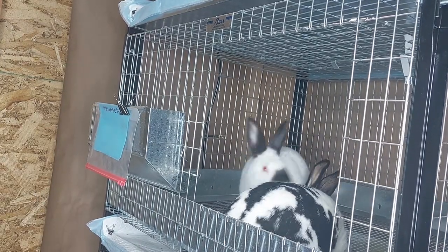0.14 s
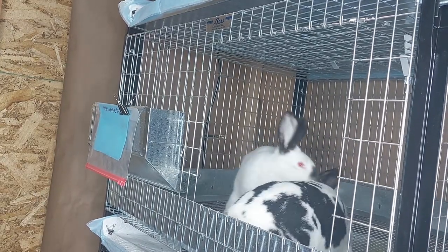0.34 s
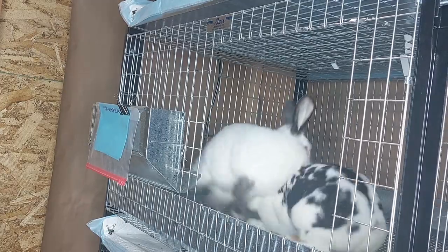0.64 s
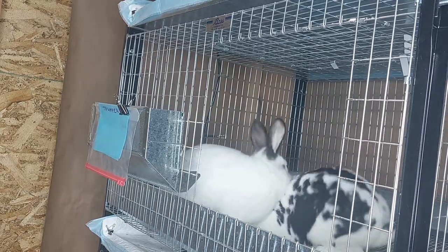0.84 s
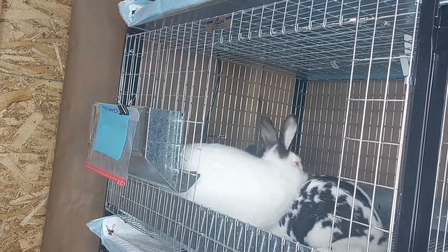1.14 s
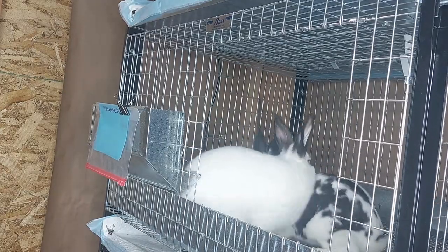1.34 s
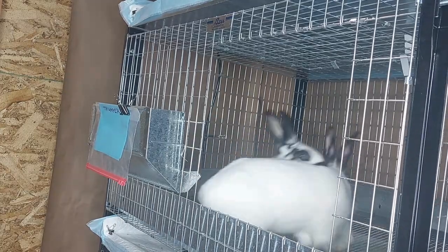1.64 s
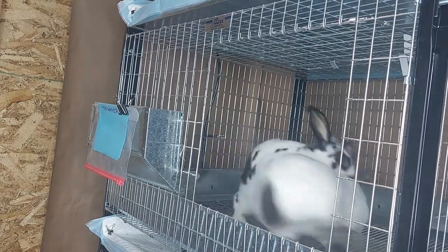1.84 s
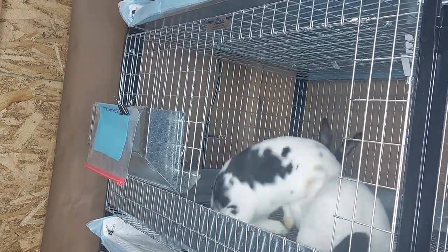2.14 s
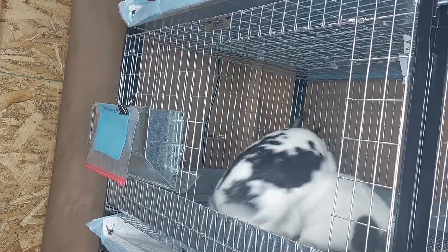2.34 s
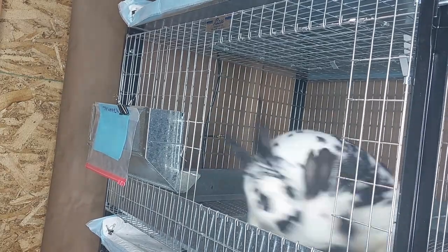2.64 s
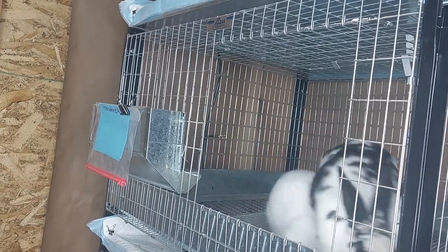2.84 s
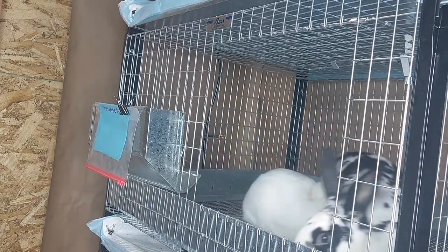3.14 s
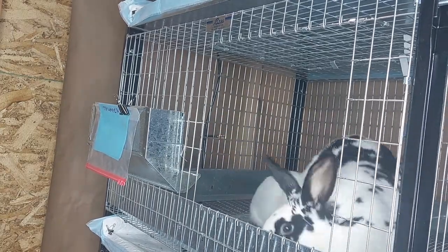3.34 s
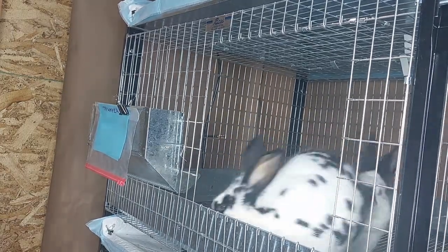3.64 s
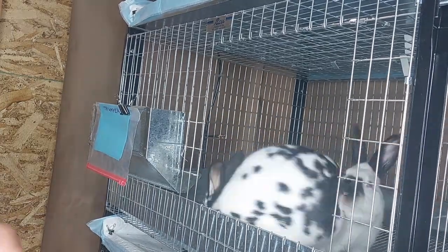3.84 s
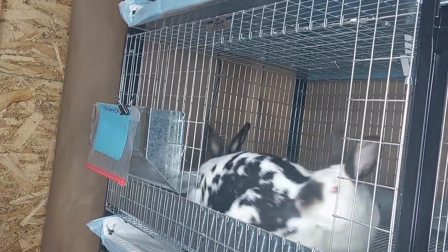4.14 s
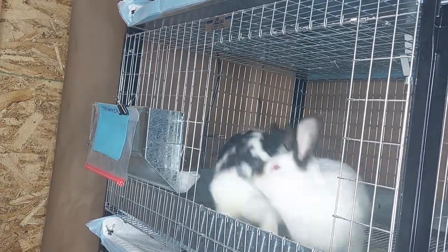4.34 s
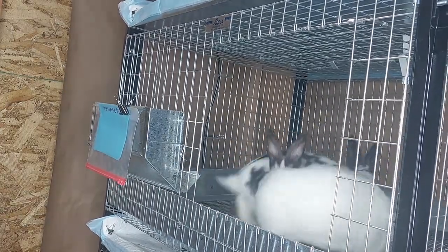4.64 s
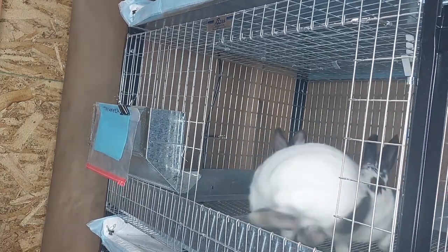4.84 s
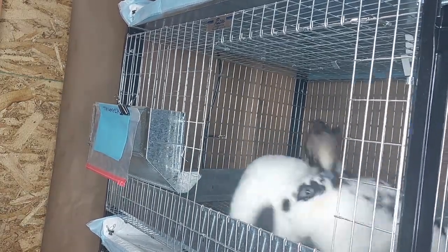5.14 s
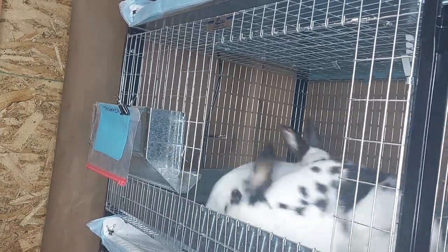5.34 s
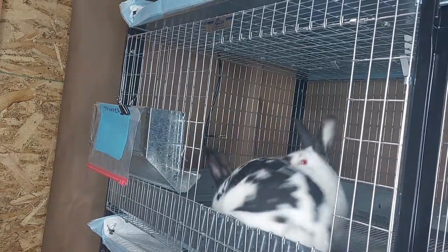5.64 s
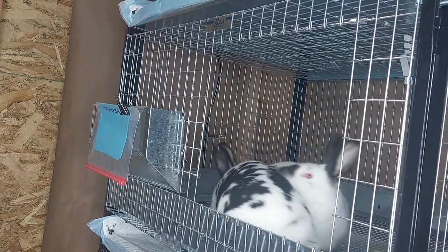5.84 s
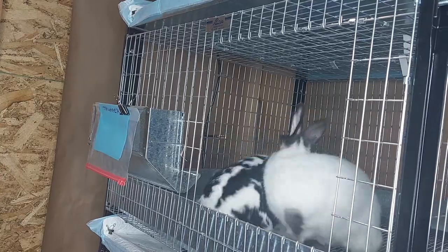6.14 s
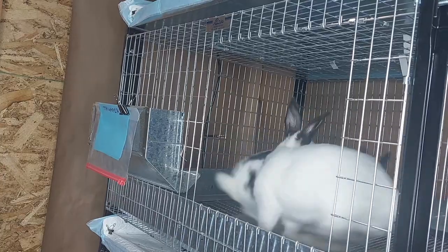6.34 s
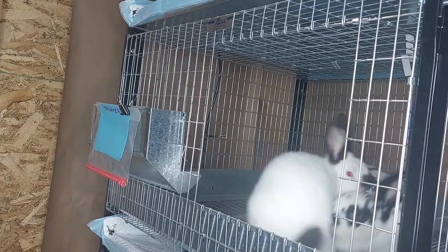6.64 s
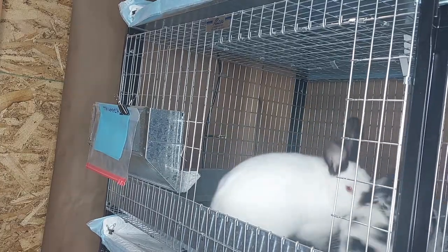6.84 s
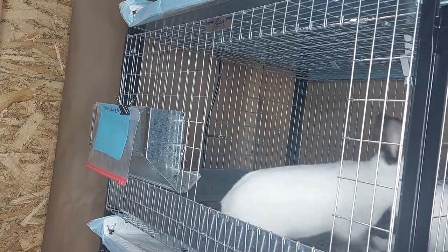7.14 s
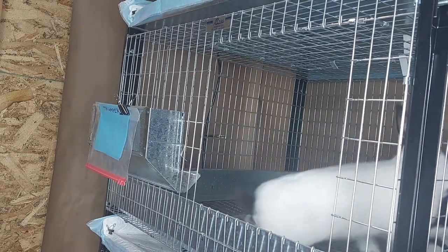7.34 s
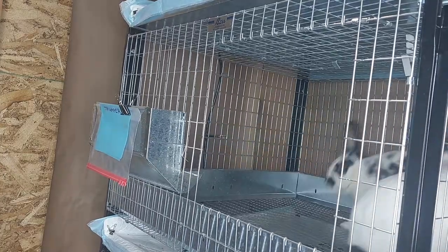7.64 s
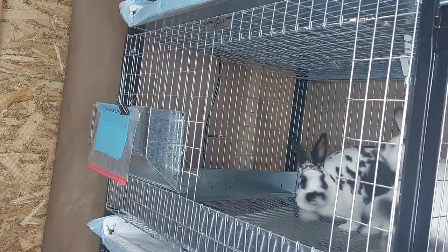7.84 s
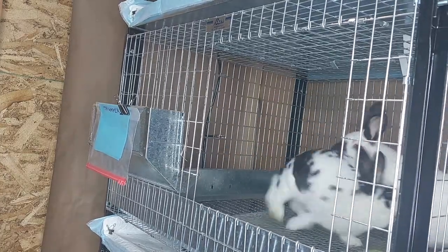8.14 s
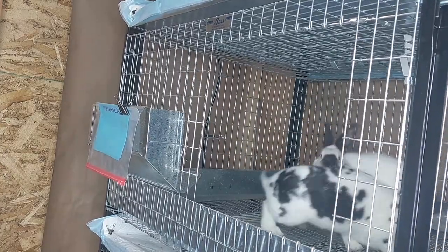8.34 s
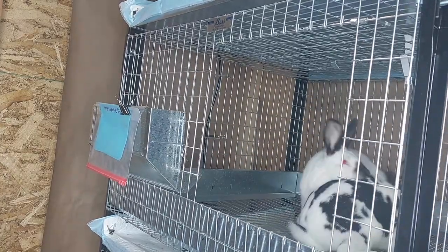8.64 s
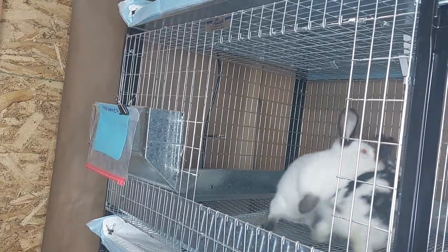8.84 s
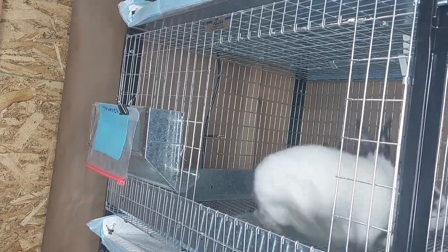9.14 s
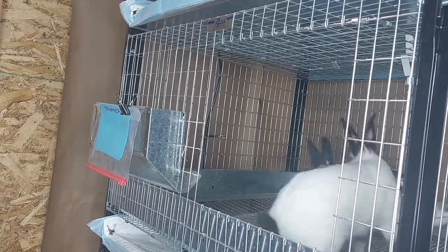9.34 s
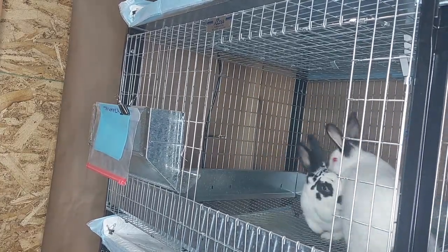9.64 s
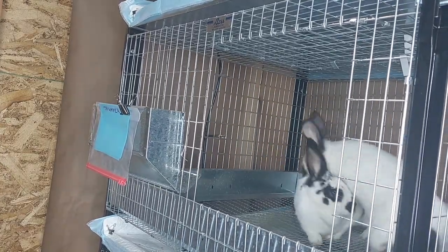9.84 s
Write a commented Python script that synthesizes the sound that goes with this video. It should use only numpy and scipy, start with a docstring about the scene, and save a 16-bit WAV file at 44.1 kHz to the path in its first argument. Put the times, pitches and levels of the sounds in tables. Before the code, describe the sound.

Bursts of scratchy, metallic cage rattle as two rabbits chase and shove on a mesh floor, with dull thumps, in a small wooden shed.

```python
"""A hissing, clattering scuffle: two rabbits in a wire cage in a small wooden shed, about a metre from a phone.
Each shove of a paw gathers, swells, lets go and settles, dragging claws and fur over the mesh: dense trains
of slips make the wires hiss, the bars and frame clatter and the sheet-metal tray rumble.
Hind feet thump the floor, struck as a set of decaying modes.
Behind them a motor hums faintly and unsteadily as a few sines, over filtered noise for the air."""
import sys
import numpy as np
from scipy import signal
from scipy.fft import rfft, irfft, next_fast_len
from scipy.io import wavfile
from scipy.ndimage import uniform_filter1d, map_coordinates

SR = 44100
rng = np.random.default_rng(int(sys.argv[2]) if len(sys.argv) > 2 else 0)


def to_wav(sig):
    """Store sig (one row per channel, or 1-D mono) as 16-bit WAV at the path in sys.argv[1].

    Samples outside -1..1 are clipped; the rate is SR.
    """
    pcm = np.clip(np.atleast_2d(sig), -1, 1) * 32767
    pcm = np.round(pcm).astype(np.int16)
    wavfile.write(sys.argv[1], SR, pcm.T)  # frames by channels


N = 440559

# Shoves of a paw over the mesh. Each row: peak in seconds, time to let go in seconds,
# drive of the wires in dB, extra body weight on the heavy parts in dB.
PAW_SHOVES = [(0.34, 0.57, -53, 1), (0.666, 0.16, -27, 2.5), (0.761, 0.32, -35.5, -2.5),
              (0.887, 0.18, -39, 3), (1.337, 0.044, -58.5, -11), (1.453, 0.16, -28.5, -8),
              (1.591, 0.1, -28.5, 2.5), (1.83, 0.31, -31, 3), (1.883, 0.16, -28, -1),
              (1.947, 0.23, -28.5, 2.5), (2.083, 0.13, -34.5, -1), (2.44, 0.044, -44, -1),
              (2.529, 0.19, -27.0, 1.5), (2.564, 0.19, -23.0, -1.5), (2.751, 0.15, -33.0, 1.0),
              (2.875, 0.35, -36.5, 1), (2.972, 0.14, -28, 0.5), (3.35, 0.13, -48, -1.5),
              (3.424, 0.19, -38.5, -2), (3.608, 0.096, -35, -4.5), (3.688, 0.13, -37.5, -0.5),
              (4.15, 0.15, -44, -3.5), (4.244, 0.13, -43.0, -1), (4.459, 0.56, -39, 5.5),
              (4.497, 0.096, -21.5, -1), (4.631, 0.078, -31.5, 3), (4.738, 0.42, -27.5, 0),
              (4.871, 0.085, -21, 3), (5.033, 0.35, -35.5, 0.0), (5.221, 0.61, -35.5, 3.0),
              (5.348, 0.082, -28.5, 2), (5.42, 0.088, -23, 1.5), (5.565, 0.33, -33.5, 1.5),
              (5.674, 0.093, -19.5, 0.5), (5.764, 0.22, -32.5, 0), (5.94, 0.63, -38.5, -1.5),
              (6.092, 0.13, -31, -7.0), (6.149, 0.08, -31, 3), (6.323, 0.29, -34, -5.0),
              (6.412, 0.23, -31.5, 1), (6.471, 0.1, -21, 0), (6.687, 0.47, -40.5, 1),
              (6.887, 0.1, -35, -1.5), (7.136, 0.34, -50.0, -1), (7.291, 0.033, -48.5, -2.0),
              (7.49, 0.17, -28, -4.5), (7.554, 0.079, -28, 3.5), (7.644, 0.25, -46.5, 1.5),
              (7.745, 0.044, -42.5, -6.5), (7.96, 0.37, -36.0, -0.5), (8.096, 0.48, -41.5, 1.5),
              (8.196, 0.05, -35.5, 7.5), (8.272, 0.1, -33.5, 3.5), (8.369, 0.11, -26, 4.5),
              (8.42, 0.15, -28, -5), (8.486, 0.22, -31.5, 2.5), (8.63, 0.28, -42, -3),
              (8.824, 0.21, -39.5, 3), (8.877, 0.08, -32, 1.5), (8.934, 0.14, -29.5, -3.5),
              (9.061, 0.17, -29, 1), (9.208, 0.11, -22, 1), (9.502, 0.096, -35.5, 0.5),
              (9.606, 0.077, -26, 2), (9.688, 0.094, -23.5, 0.5), (9.791, 0.12, -40.5, -0.5)]
PLACES = 4  # spots on the mesh that the paws take in turn


def scuffling():
    """The rabbits keep moving, so successive shoves fall on different places of the mesh."""
    fine = patchy_hiss(slips(rate=4500, spread_db=3.0), patchy_db=5.0, width_hz=687, hold_s=.018)
    coarse = patchy_hiss(slips(rate=2400, spread_db=2.5), patchy_db=6, width_hz=223, hold_s=.04)
    cage = np.zeros((2, N))
    for place in range(PLACES):
        # every place has its own stretch of the slipping
        shift = place * SR
        cage += scrabbling(PAW_SHOVES[place::PLACES], np.roll(fine, shift), np.roll(coarse, shift))
    return cage


# Spectra of the thin wires, stout bars, frame and sheet-metal tray, before they vary from place to place.
# Each row: frequency in Hz, relative level in dB.
WIRE_SPECTRUM = [(2590, -30.5), (4400, -4), (5830, -5.5), (8190, -5), (9840, -8.5), (12100, -2),
                 (15100, -4.5), (16000, -7.5)]
BAR_SPECTRUM = [(1410, -29.5), (2400, -3.5), (3300, 0), (3590, -0.5), (4030, -0.5), (4500, -8),
                (5850, -28.5), (9900, -120)]
FRAME_SPECTRUM = [(250, -31.5), (430, -6.5), (495, -6.5), (626, -1), (674, -4.5), (731, -2.5), (781, -7),
                  (911, -2.5), (981, -5.5), (1240, -7), (1770, -0.5), (2370, -9), (2500, -25.5),
                  (3250, -11), (5500, -120)]
TRAY_SPECTRUM = [(53, -46), (90, -16.5), (113, -4), (151, -10), (232, -1), (265, -0.5), (298, -4),
                 (328, -8), (366, -2.5), (470, -15), (610, -14), (1030, -120)]


def scrabbling(shoves, fine, coarse):
    """Shoves at one place on the mesh drive the thin wires, the stout bars, the frame and the heavy tray."""
    wire_db, frame_db, tray_db = loads(shoves)
    grip = catching(rate=150, depth_db=3.0) * catching(rate=20, depth_db=1.3)

    wire_force = grip * sharpen(fine, pressure(shoves, wire_db), edge_hz=11700, firm_db=-42.0, power=0.14)
    # the bars join the wires to the frame and take their level from both
    bar_force = grip * fine * pressure(shoves, (wire_db + frame_db) / 2)
    frame_scrape = sharpen(coarse, pressure(shoves, frame_db), edge_hz=1630, firm_db=-33, power=0.28)
    frame_force = np.sqrt(grip) * frame_scrape
    tray_force = slips(rate=900, spread_db=4.5) * pressure(shoves, tray_db)

    wires = play(wire_force, part(WIRE_SPECTRUM, vary_db=.5, ring_t60=0.017, shed_t60=0.4, shed_db=-12.5))
    bars = play(bar_force, part(BAR_SPECTRUM, vary_db=.5, ring_t60=0.034, shed_t60=0.46, shed_db=-4.0))
    frame = play(frame_force, part(FRAME_SPECTRUM, vary_db=0.26, ring_t60=0.054, shed_t60=0.57, shed_db=-0.5))
    tray = play(tray_force, part(TRAY_SPECTRUM, vary_db=2.0, ring_t60=0.049, shed_t60=0.68, shed_db=0.0))
    return undb(0.86) * wires + undb(-4.5) * bars + frame + tray


# drive of wires, frame and tray in an ordinary shove
WIRE_DB, FRAME_DB, TRAY_DB = -25, -30.5, -37.5
# dB that frame and tray gain for each dB of the wires
FRAME_GROWTH, TRAY_GROWTH = 0.78, 0.6


def loads(shoves):
    """Drive in dB: the heavy parts follow the wires less steeply, and feel the body's weight."""
    _, _, wire_db, weight_db = np.transpose(shoves)
    effort_db = wire_db - WIRE_DB
    frame_db = FRAME_DB + FRAME_GROWTH * effort_db + weight_db
    tray_db = TRAY_DB + TRAY_GROWTH * effort_db + weight_db
    return wire_db, frame_db, tray_db


# a shove of ordinary length swells in ATTACK_S; short kicks swell faster, long drags more slowly
# (by this power of the length)
LENGTH_S, ATTACK_S, ATTACK_POWER = 0.15, 0.035, 0.17
# the paw gathers a grip first: level where the swell begins, before the weight is added, and growth until then
GATHER_DB, GATHER_DB_PER_S = -17, 230
# after each shove the paws shuffle on faintly
SETTLE_DB, SETTLE_T60_S = -18, 1.33


def pressure(shoves, levels_db):
    """How hard the paws drag: each shove gathers, swells, lets go and settles; their powers add."""
    t = np.arange(-SR // 4, SR) / SR  # seconds from the peak
    power = np.zeros(N)
    settling = undb(SETTLE_DB - 60 * np.maximum(t, 0) / SETTLE_T60_S)
    for (peak_s, length, _, weight_db), db in zip(shoves, levels_db):
        attack = ATTACK_S * (length / LENGTH_S) ** ATTACK_POWER
        swell = np.interp(t, [-attack, 0], [0, 1])
        # the more weight the paw bears, the stronger the gathering
        gather_db = GATHER_DB + weight_db + GATHER_DB_PER_S * np.minimum(t + attack, 0)
        gathering = (1 - swell) * undb(gather_db) ** 2
        letting_go = np.interp(t, [0, length], [1, 0])
        shove = swell ** 2 * (letting_go ** 2 + settling ** 2)
        add(power, peak_s + t[0], undb(db) ** 2 * (gathering + shove))
    return np.sqrt(power)


def slips(rate, spread_db):
    """Tiny stick-slip kicks of uneven size, at a mean rate per second; rms 1."""
    happens = rng.random(N) < rate / SR
    size = undb(spread_db * rng.standard_normal(N))
    kicks = happens * rng.choice([-1, 1], N) * size
    return kicks / np.std(kicks)


def patchy_hiss(kicks, patchy_db, width_hz, hold_s):
    """The hiss is patchy: random pitches are favoured for a moment; rms 1."""
    hz, s, frames = signal.stft(kicks, SR, nperseg=512)
    spots = np.meshgrid(hz / width_hz, s / hold_s, indexing="ij")
    favour = map_coordinates(rng.standard_normal((200, 2000)), spots, order=1, mode="wrap")
    patchy_frames = frames * undb(patchy_db * np.tanh(favour))
    kicks = signal.istft(patchy_frames, SR)[1][:N]
    return kicks / np.std(kicks)


def catching(rate, depth_db):
    """The claws catch and free themselves: a gain gliding to a new random value rate times a second; rms 1."""
    steps = np.tanh(rng.standard_normal(N))
    gain = undb(depth_db * np.interp(np.arange(N) * rate / SR, np.arange(N), steps))
    return gain / np.sqrt(np.mean(gain ** 2))


def sharpen(kicks, force, edge_hz, firm_db, power):
    """Firm scrapes slip more abruptly, so the sound above edge_hz grows faster than the rest."""
    low_pass = signal.butter(2, edge_hz, fs=SR, output="sos")
    soft = signal.sosfiltfilt(low_pass, kicks)
    sharp = (kicks - soft) * (force / undb(firm_db)) ** power
    return force * (soft + sharp)


def part(spectrum, vary_db, ring_t60, shed_t60, shed_db):
    """Response of one part of the cage; its colour differs a little from place to place."""
    here = [(hz, db + vary_db * rng.standard_normal()) for hz, db in spectrum]
    return unit(colour(ringing(ring_t60, shed_t60, shed_db), here))


def ringing(ring_t60, shed_t60, shed_db):
    """Countless close modes die quickly; the shed's boards carry the sound on. Cut at half a second."""
    t = np.arange(SR) / SR
    ring_power = unit(undb(-60 * t / ring_t60)) ** 2
    shed_power = unit(undb(-60 * t / shed_t60)) ** 2 * undb(2 * shed_db)
    spectrum = rfft(rng.standard_normal((2, len(t))) * np.sqrt(ring_power + shed_power))
    # the modes share the energy evenly over every stretch of frequencies
    spectrum /= np.sqrt(uniform_filter1d(np.abs(spectrum) ** 2, size=80))
    return ears(irfft(spectrum))[:, :SR // 2]


# Footfalls of the hind feet. Each row: start in seconds, strength in dB,
# pitch that the landing place favours in Hz, spread around it in octaves.
FOOTFALLS = [(0.23, -40, 730, 0.83), (0.260, -29, 560, 2.3), (0.507, -44, 800, .8), (4.409, -31, 240, 1.8),
             (4.702, -25.5, 215, 0.75), (4.745, -27, 210, .45), (4.79, -27, 210, .45),
             (4.9, -29, 233, 0.26), (4.985, -27.5, 250, .7), (5.136, -26, 300, 1.4),
             (5.234, -24, 275, 0.86), (5.263, -22, 230, 0.64), (5.305, -27, 260, 0.87),
             (5.478, -27, 240, 0.31), (6.749, -29, 195, .5), (6.785, -35, 500, 1.6), (7.123, -38.5, 750, 1),
             (7.414, -40, 700, 1.6), (8.195, -25, 450, 2.1), (8.231, -22.5, 630, 0.16),
             (8.25, -26.5, 232, .4), (8.29, -33, 330, 1.3), (8.469, -26.5, 264, .6),
             (8.545, -24, 720, 0.12), (9.524, -25.5, 700, 0.12), (9.712, -32, 230, 0.31),
             (9.914, -29.5, 270, 1.8)]
# Modes of the floor, before slight detuning. Each row: frequency in Hz, relative level in dB, t60 in seconds.
FLOOR = [(172.4, 3.5, 0.15), (216.6, -5.5, 0.26), (236.5, -2, 0.19), (310, 1.5, 0.12), (436, 0.5, .12),
         (532, 1.5, 0.082), (642, -2, 0.17), (710, 7.5, 0.076), (813, 0.5, 0.11), (930, -2, 0.059),
         (1070, 2, 0.039), (1510, -8, 0.088)]


def footfalls(contact_s, shed_db):
    """A padded foot strikes the floor modes; where it lands decides between a boom and a hollow knock."""
    t, track = np.arange(SR // 2) / SR, np.zeros(N)
    hz, mode_db, t60 = np.transpose(FLOOR)[:, :, None]
    detune = 1 + 0.0062 * rng.standard_normal((len(FOOTFALLS), len(hz), 1))
    contact = 1 - np.exp(-t / contact_s)  # the soft pad rounds the onset
    for (start_s, db, pitch, spread), stretch in zip(FOOTFALLS, detune):
        share = undb(mode_db) * np.exp(-(np.log2(hz / pitch) / spread) ** 2)
        # the foot pushes each mode on a crest or in a trough
        signs = rng.choice([-1, 1], hz.shape)
        decay = np.exp(-np.log(1000) * t / t60)
        modes = signs * share * decay * np.sin(2 * np.pi * hz * stretch * t)
        add(track, start_s, undb(db) * contact * modes.sum(axis=0) / np.linalg.norm(share))
    answer = play(track, unit(ringing(ring_t60=0.059, shed_t60=0.6, shed_db=-17)))
    return track + undb(shed_db) * answer


# Notes of the motor hum. Each row: frequency in Hz, rms level in dB before the swell.
# The first row's level is unused: the next table sets it.
HUM_NOTES = [(59.2, -58), (118.4, -58.5), (236.9, -58), (296.1, -72), (414.5, -67), (495.3, -74),
             (640.6, -73)]
# Wavering of the lowest note. Each row: time in seconds, rms level in dB.
LOWEST_NOTE_LEVEL = [(0.0, -70), (0.8, -50), (1.52, -69), (1.68, -53), (1.84, -59), (2.0, -54), (2.56, -60),
                     (2.96, -53), (3.76, -75), (4.48, -47.5), (5.12, -57), (5.2, -64), (5.68, -52),
                     (6.64, -54), (6.8, -63), (8.48, -53), (8.88, -64), (9.98, -54.5)]


def motor_hum():
    """Sines of steady pitch; the lowest note wavers widely and the others follow it by about a third in dB."""
    t = np.arange(N) / SR
    lines = [np.sin(2 * np.pi * (hz * t + rng.random())) * np.sqrt(2) for hz, _ in HUM_NOTES]
    lowest_db = np.interp(t, *np.transpose(LOWEST_NOTE_LEVEL))
    swell = undb(.35 * (lowest_db - np.mean(lowest_db)))
    upper = sum(undb(db) * line for (_, db), line in zip(HUM_NOTES[1:], lines[1:]))
    return undb(lowest_db) * lines[0] + swell * upper


# Spectrum of the air in the shed. Each row: frequency in Hz, relative level in dB.
AIR_SPECTRUM = [(25, -19), (60, 3), (120, -5), (250, -12), (450, -9), (860, -22), (1600, -16.5),
                (2900, -30), (4000, -24.5), (5500, -38.5), (16000, -26)]


def shed_air(rms_db):
    """The faint rush of the air: coloured two-channel noise."""
    air = colour(ears(rng.standard_normal((2, next_fast_len(N)))), AIR_SPECTRUM)[:, :N]
    return undb(rms_db) * air / np.std(air)


# Likeness of the two channels. Each row: frequency in Hz, correlation.
CHANNEL_LIKENESS = [(60, 0.86), (200, 0.91), (380, 0.81), (700, 0.38), (1300, 0.093), (2400, -0.0018),
                    (4400, -0.12), (6500, 0.26), (8500, 1), (15000, 0.89)]
# Balance of the two channels. Each row: frequency in Hz, left minus right in dB.
CHANNEL_BALANCE = [(60, 4.5), (200, -3.5), (380, 0.5), (700, -5), (1400, 1), (2800, -1), (5500, -1),
                   (9000, -0.5), (14000, -5.5)]


def ears(pair):
    """Two unrelated signals become left and right, with a likeness and balance set for each frequency."""
    size = pair.shape[-1]
    hz = np.fft.rfftfreq(size, 1 / SR)
    alike = np.clip(along(CHANNEL_LIKENESS, hz), -.99, .99)
    sides = np.array([[1], [-1]])
    mid, side = rfft(pair)
    both = np.sqrt((1 + alike) / 2) * mid + sides * np.sqrt((1 - alike) / 2) * side
    return irfft(both * undb(sides * along(CHANNEL_BALANCE, hz) / 2), size)


def colour(x, spectrum):
    """Causal minimum-phase filter with the given (Hz, dB) shape, made by folding the cepstrum."""
    size = next_fast_len(2 * x.shape[-1])
    size += size % 2
    log_gain = np.log(undb(along(spectrum, np.fft.rfftfreq(size, 1 / SR))))
    cepstrum = irfft(log_gain)
    cepstrum[1:size // 2] *= 2
    cepstrum[size // 2 + 1:] = 0
    return irfft(rfft(x, size) * np.exp(rfft(cepstrum)))[..., :x.shape[-1]]


def play(force, response):
    """Pass a force through a two-channel response."""
    return signal.fftconvolve(force[None], response, axes=1)[:, :N]


def add(track, s, sound):
    """Mix a sound into a track from time s."""
    i = max(int(s * SR), 0)
    track[i:i + len(sound)] += sound[:max(N - i, 0)]


def along(table, hz):
    """Read (Hz, value) points on a log-frequency axis."""
    f, value = np.transpose(table)
    return np.interp(np.log(hz + 1), np.log(f), value)


def unit(x):
    """Scale a response to unit energy per channel on average."""
    return x / np.sqrt(np.mean(np.sum(x ** 2, axis=-1)))


def undb(db):
    """Decibels to gain."""
    return 10 ** (np.asarray(db) / 20)


def scene():
    """The scuffle in the cage, the thumping feet, then the hum and air of the shed."""
    feet = footfalls(contact_s=0.0035, shed_db=-7)
    return scuffling() + feet + motor_hum() + shed_air(rms_db=-57)


def record(dry):
    """The phone cuts the top steeply above 15850 Hz."""
    return signal.sosfilt(signal.ellip(12, .1, 80, 15850, fs=SR, output="sos"), dry)


dry = scene()
out = record(dry)
to_wav(out)
```